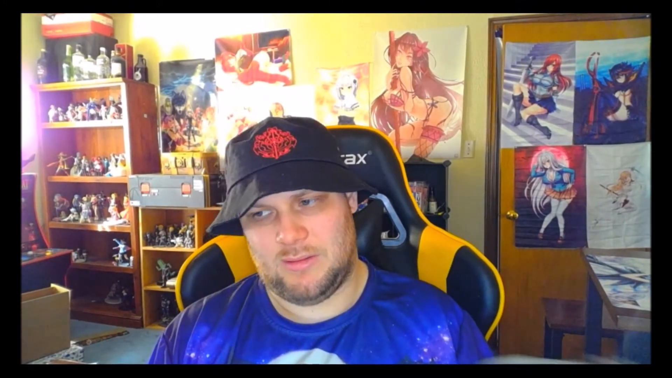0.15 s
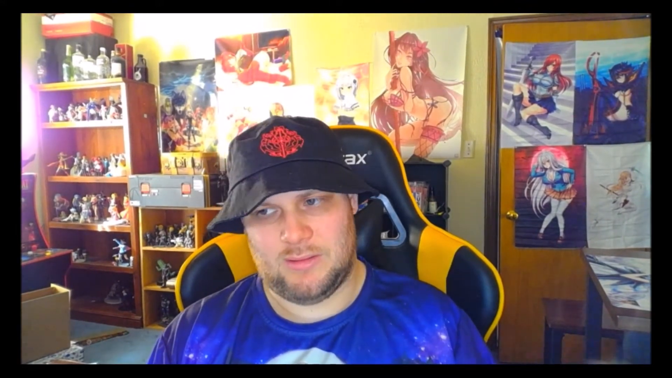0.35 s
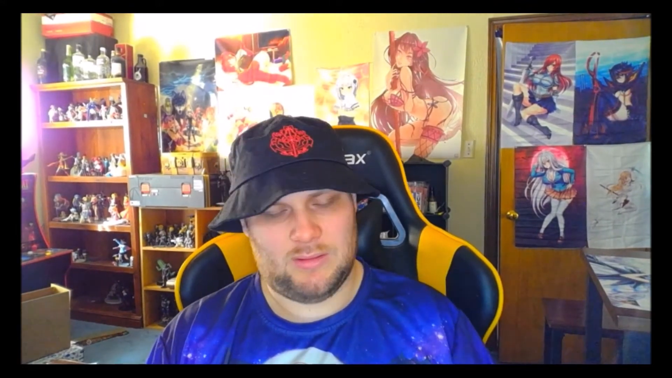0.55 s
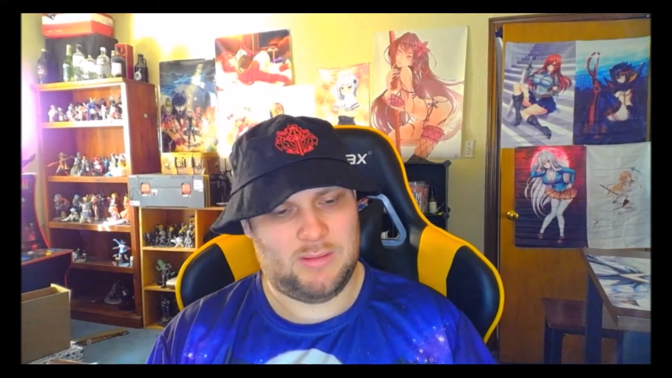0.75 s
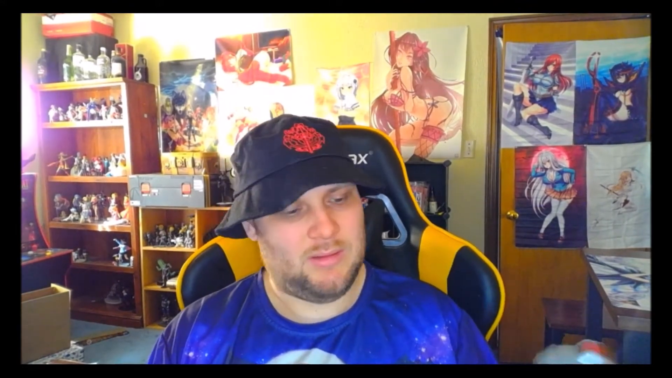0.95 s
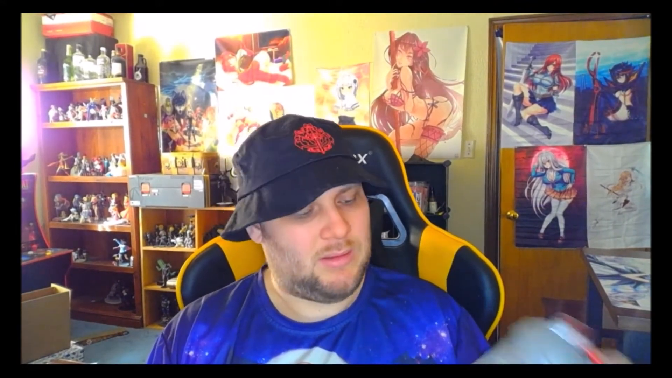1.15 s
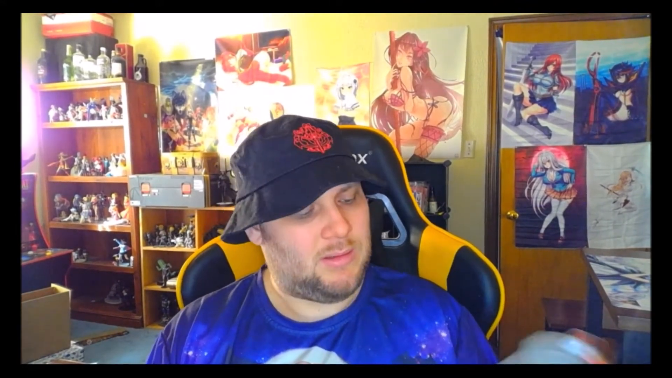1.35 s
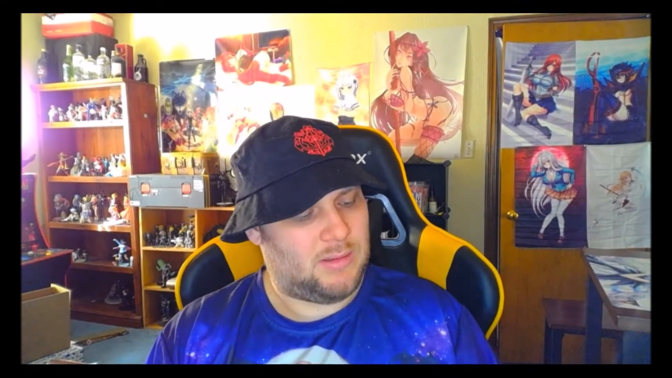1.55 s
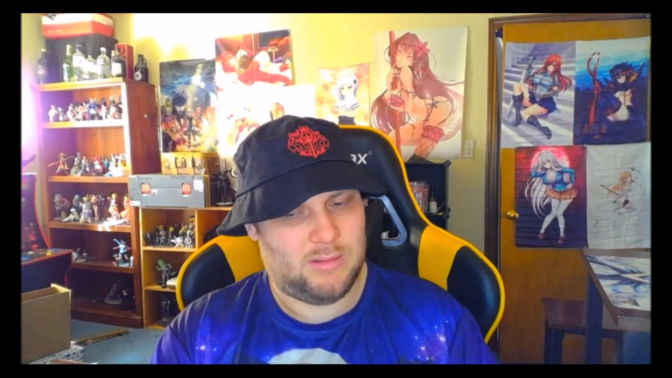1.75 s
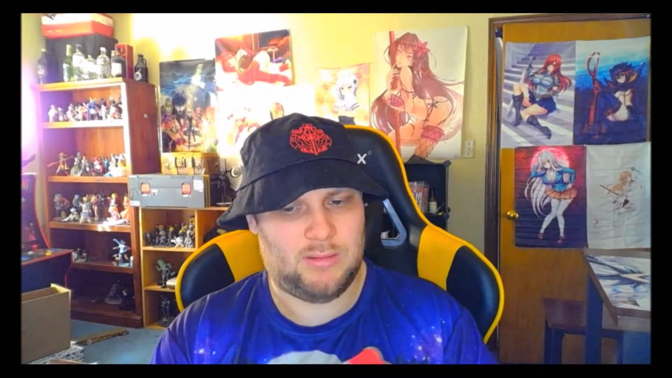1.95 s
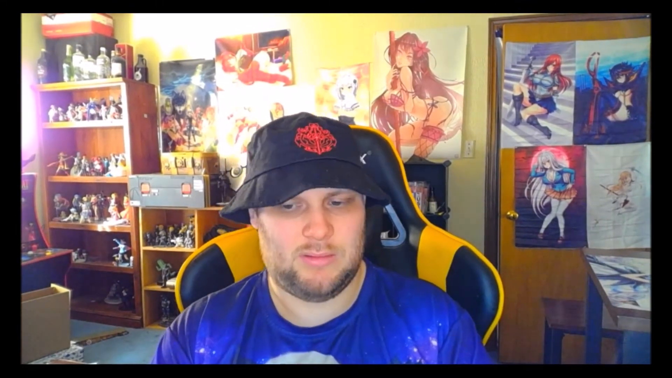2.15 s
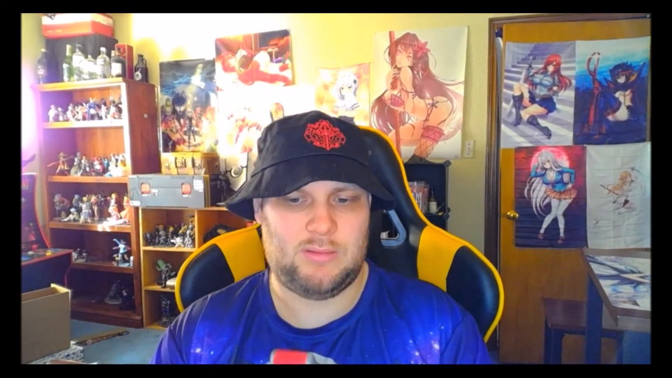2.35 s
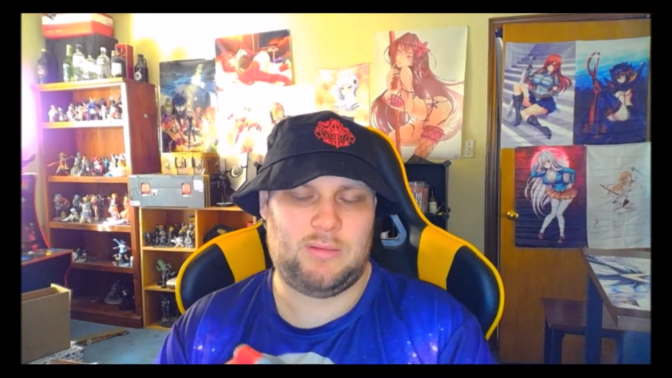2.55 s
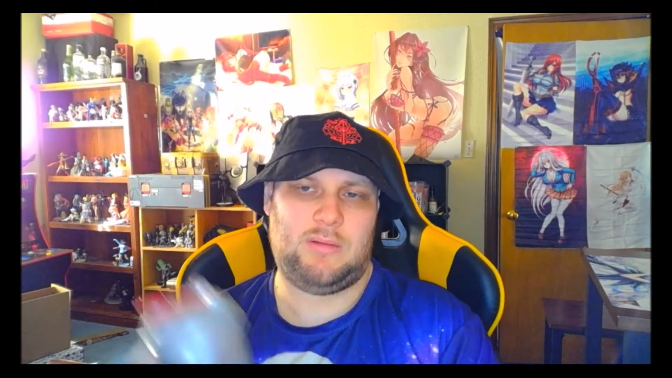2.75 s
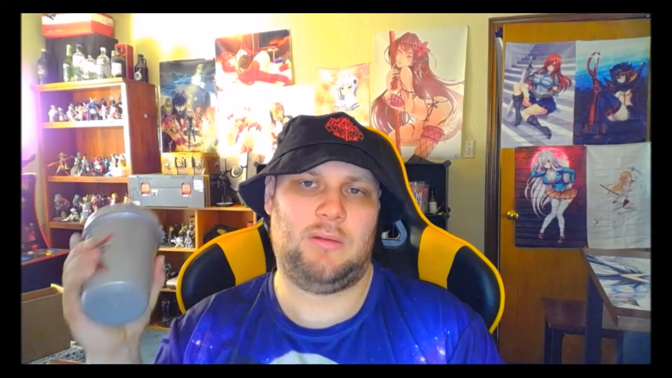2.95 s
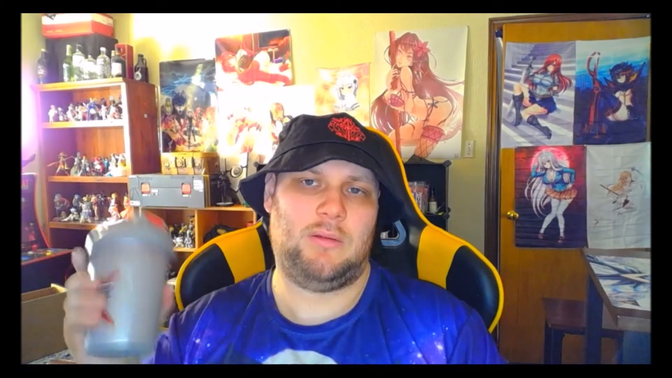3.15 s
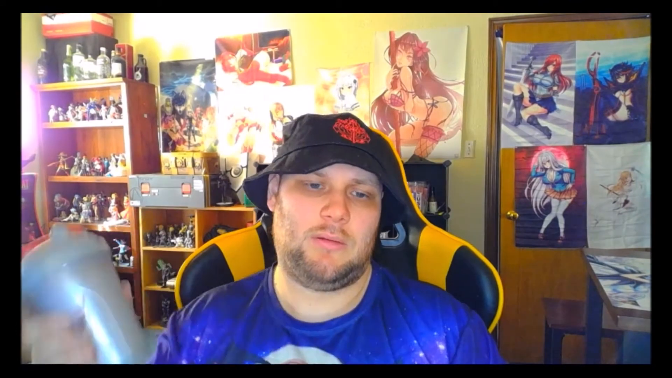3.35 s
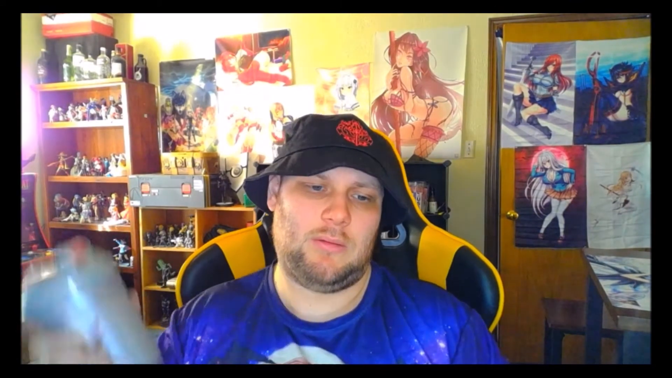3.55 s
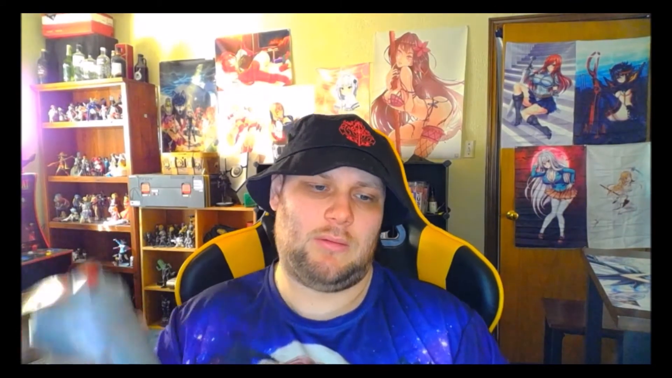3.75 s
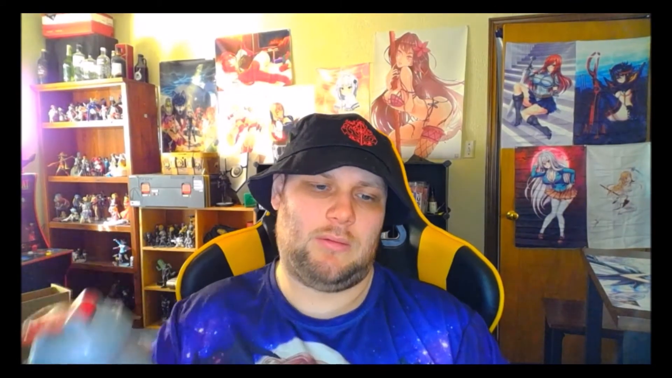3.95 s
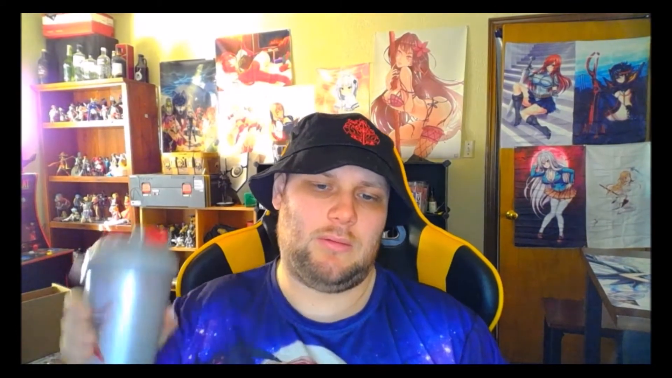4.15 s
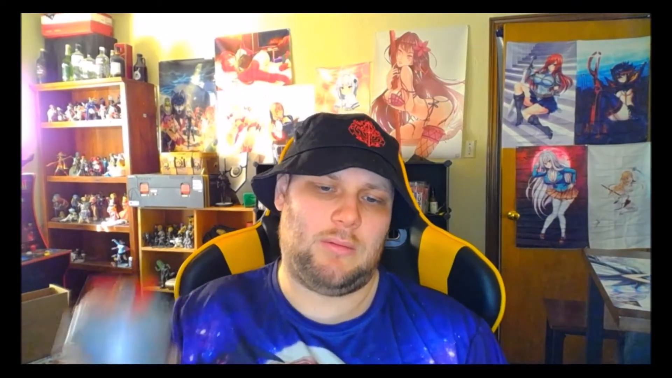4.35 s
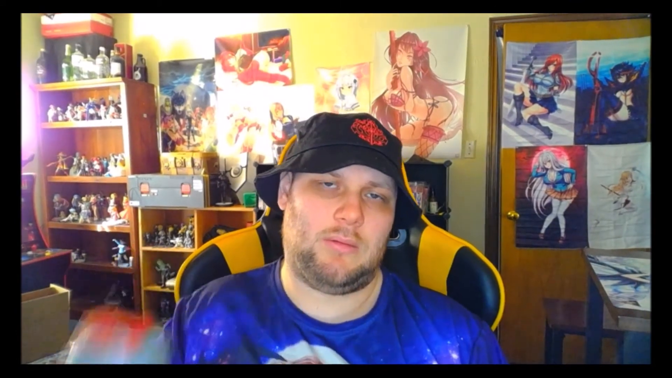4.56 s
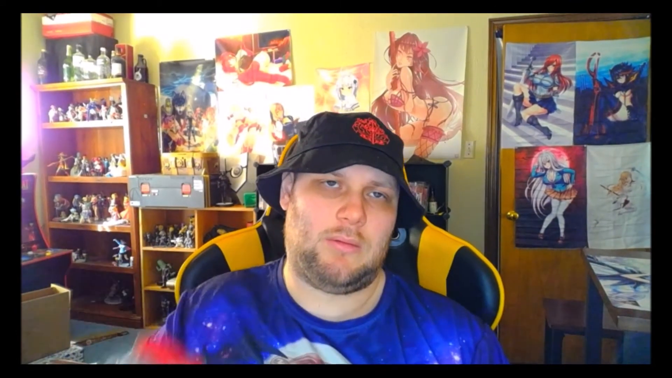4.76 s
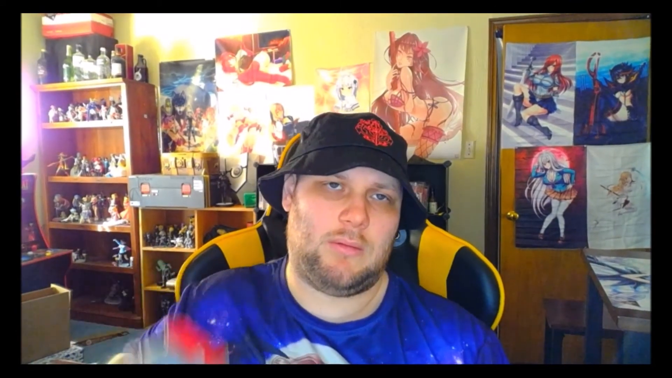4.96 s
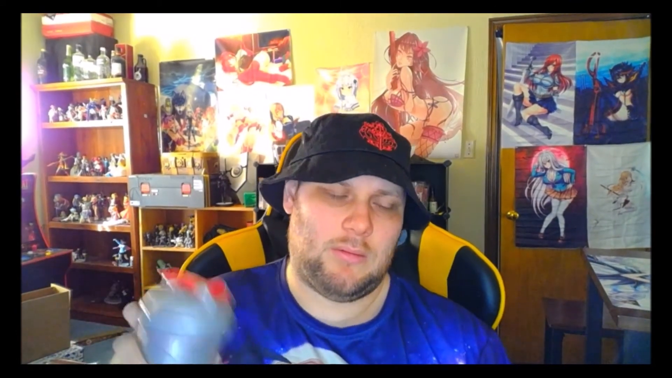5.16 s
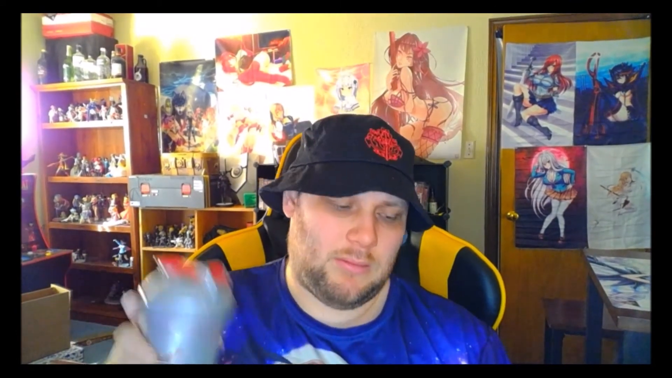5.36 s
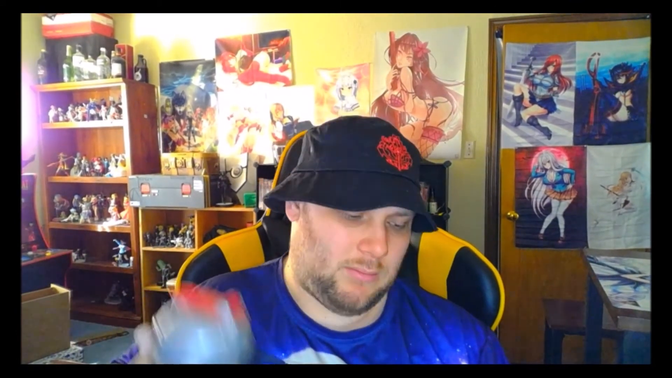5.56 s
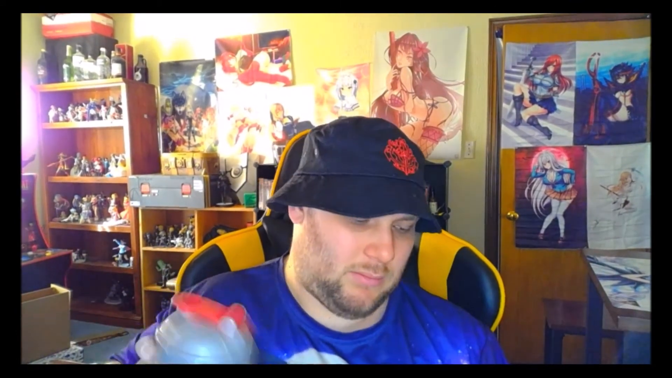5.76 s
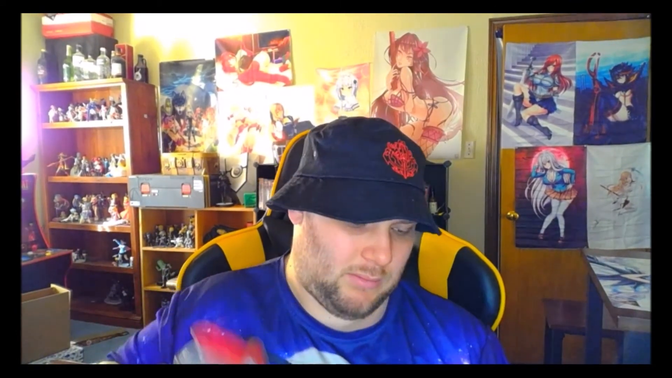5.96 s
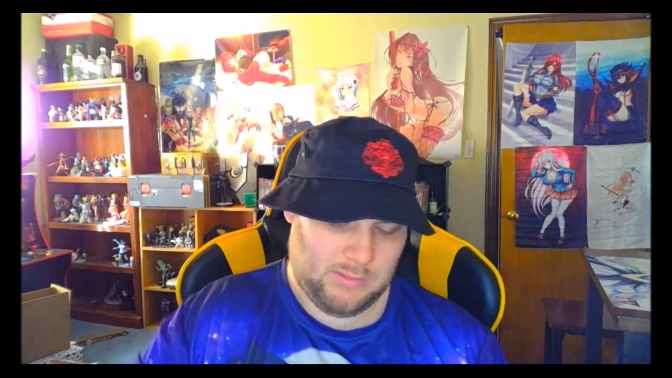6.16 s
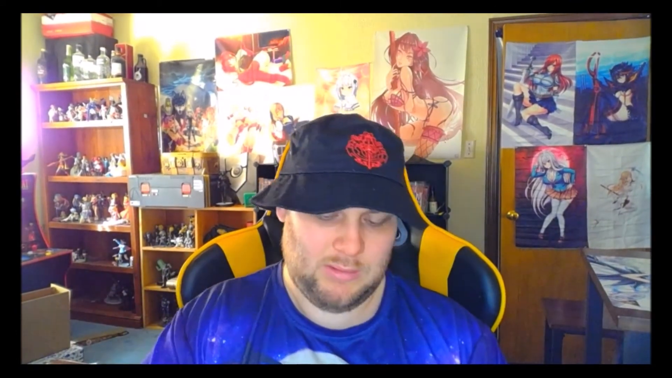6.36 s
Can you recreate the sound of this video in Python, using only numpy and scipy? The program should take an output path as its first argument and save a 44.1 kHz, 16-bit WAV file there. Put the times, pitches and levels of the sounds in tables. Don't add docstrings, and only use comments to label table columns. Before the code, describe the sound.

Close to a microphone in a small, nearly silent room, a plastic shaker cup is shaken very fast. Liquid slaps lid and base with gurgles and hissing spray while a wire ball clacks on the wall. It stops for over a second with faint tinkles, then a longer, wetter, more vigorous bout follows and quickly dies into small drips of slosh.

```python
import sys
import numpy as np
from scipy import signal
from scipy.fft import rfft, irfft, next_fast_len
from scipy.io import wavfile
from scipy.ndimage import uniform_filter1d

SR = 44100
rng = np.random.default_rng(int(sys.argv[2]) if len(sys.argv) > 2 else 0)


def transcribe(signal):
    frames = np.atleast_2d(signal).T
    limited = np.clip(frames, -1, 1)
    pcm = np.round(limited * 32767).astype(np.int16)
    wavfile.write(sys.argv[1], SR, pcm)


def volts_from_db(level):
    exponent = np.asarray(level, float) / 20
    return 10 ** exponent


N = 281843


def unit(x):
    return x / np.sqrt(np.mean(x ** 2) + 1e-20)


def along(points, hz):
    f, v = np.transpose(points)
    return np.interp(np.log(hz + 1), np.log(f + 1), v)


def filtered(x, response):
    m = next_fast_len(N + SR // 2)
    f = np.fft.rfftfreq(m, 1 / SR)
    return irfft(rfft(x, m) * response(f), m)[:N]


def ringing(modes, f):
    total = 0
    for k, (centre, width, db) in enumerate(modes):
        resonance = 1j * f * width / (centre * centre - f * f + 1j * f * width)
        total = total + (-1) ** k * volts_from_db(db) * resonance
    return total


def patchy(x, depth_db):
    z = signal.stft(x, nperseg=512)[2]
    field = uniform_filter1d(rng.standard_normal(z.shape), size=3, axis=0)
    field = uniform_filter1d(field, size=9, axis=1)
    return unit(signal.istft(z * volts_from_db(depth_db * unit(field)), nperseg=512)[1][:N])


def strokes(rows, lag=0, slower=1, round_off=1.1):
    power, t = np.full(N + SR, 1e-16), np.arange(SR // 2) / SR
    for s, db, rise, t60 in rows:
        top = max(rise + lag, .002)
        fall_db = -60 * (np.maximum(t - top, 0) / (slower * t60)) ** round_off
        swell = np.sin(np.pi / 2 * np.minimum(t / top, 1)) ** 0.92
        at = max(round(s * SR), 0)
        power[at:][:len(t)] += (volts_from_db(db + fall_db) * swell) ** 2
    return np.sqrt(power[:N])


# f/Hz, level/dB per Hz
STAND = [(12, -11), (30, -7), (55, -16.5), (90, -15.5), (140, -14), (200, -34.5), (350, -120)]
# t/s, level/dB
EFFORT = [
    [(0, -65.5), (1.76, -74), (1.9, -89), (2.55, -83)],
    [(2.94, -64.5), (4.2, -57), (5.96, -54), (6.07, -63.5), (6.39, -72)],
]
# t/s, level/dB
JOLTS = [(.44, -59), (.69, -55), (1.13, -52.5), (3.23, -64.5), (3.43, -57), (4.04, -54), (4.26, -40.5),
         (4.455, -49), (4.865, -47), (5.225, -57), (5.535, -45), (6.17, -56)]
# t/s, peak/dB
NUDGES = [(1.765, -60), (1.96, -63), (2.017, -59), (2.078, -49), (2.222, -63), (2.523, -67.5)]


def rumble():
    jolt_fade_db_per_s, nudge_s, spring_hz = 350.5, .007, 18
    t = np.arange(N) / SR
    level = sum(volts_from_db(np.interp(t, *np.transpose(bout), left=-np.inf, right=-np.inf)) for bout in EFFORT)
    jolts = sum(volts_from_db(db - jolt_fade_db_per_s * abs(t - s)) for s, db in JOLTS)
    level = np.where(level > 0, level + jolts, 0)
    shake = unit(filtered(rng.standard_normal(N), lambda f: volts_from_db(along(STAND, f))))
    slosh = turns()[0]
    push = uniform_filter1d(strokes([(s, -6, rise, t60) for s, _, rise, t60 in slosh]), size=600)
    throb = 0.36 + 2.1 * push ** 2.05
    nudges = sum(-volts_from_db(db) * np.exp(-((t - s) / nudge_s) ** 2) for s, db in NUDGES)
    sprung = filtered(nudges, lambda f: 1j * f / (spring_hz + 1j * f))
    return volts_from_db(2.5) * uniform_filter1d(level, size=900) * shake * throb + sprung


# f/Hz, t60/s
ROOM = [(200, 0.29), (1300, .24), (2500, 0.16), (10000, 0.13)]


def room(x):
    hz, t, z = signal.stft(rng.standard_normal(SR // 3), SR, nperseg=256)
    decay = volts_from_db(-60 * t / along(ROOM, hz)[:, None])
    tail = signal.istft(z * decay, SR, nperseg=256)[1]
    delayed = np.pad(x, (220, 0))
    return signal.fftconvolve(delayed, tail / np.linalg.norm(tail))[:N]


# t/s, peak/dB, centre f/Hz, t60/s, spread/0-1
TINKLES = [(2.081, -57.5, 7440, 0.075, 0.08), (2.185, -51.5, 7460, 0.094, 0.24),
           (2.399, -55, 7500, 0.037, 0.25), (6.154, -33, 7330, 0.046, 0.01), (6.156, -40, 10300, .03, 0),
           (6.271, -68, 8400, .08, .05), (2.345, -74.5, 6570, 0.14, .05), (2.4, -77, 2680, .1, 0.15),
           (6.168, -45, 5260, .03, .06), (6.188, -62, 7000, 0.05, 0.3), (6.271, -55, 3600, 0.062, 0.21)]
WIRE_HZ = [2680, 3400, 4410, 5260, 6200, 6570, 7500, 8400, 8800, 10300, 11200]


def tinkles():
    out, t, modes = np.zeros(N + SR), np.arange(SR // 5) / SR, np.array(WIRE_HZ)[:, None]
    for s, db, hz, t60, spread in TINKLES:
        drift = np.cumsum(rng.standard_normal((len(modes), len(t))), axis=1)
        drift = uniform_filter1d(drift, size=40, axis=1)
        woken = np.exp(-(np.log(modes / hz) / max(spread, .05)) ** 2 / 2)
        wires = woken * np.sin(2 * np.pi * modes * t + modes / 60000 * drift)
        envelope = volts_from_db(db - 8 - 60 * t / t60) * (1 - np.exp(-t / .006))
        out[round(s * SR):][:len(t)] += envelope * wires.sum(0)
    return out[:N]


# t/s, peak/dB, f/Hz
SPITS = [(0.0596, -38, 5570), (0.0835, -35.5, 8780), (0.2844, -55, 6390), (0.3122, -49, 5920),
         (0.3524, -56, 8520), (0.4, -43.5, 8610), (0.4419, -36.5, 9450), (0.4569, -31.5, 5800),
         (0.4995, -41.5, 8730), (0.5408, -37, 8400), (0.9157, -31, 5530), (0.9802, -38, 6620),
         (1.21, -41.5, 8810), (1.229, -36, 6610), (2.993, -44, 6170), (3.0743, -25.5, 6200),
         (3.2098, -35, 6600), (3.4016, -30.5, 7780), (3.4371, -34.5, 6340), (3.5335, -28, 8420),
         (3.6037, -32, 6120), (3.675, -26, 6020), (3.826, -40, 8500), (3.8447, -22, 6360),
         (3.851, -69, 5710), (4.141, -34.5, 8050), (4.1802, -27, 6920), (4.2506, -34.5, 6370),
         (4.352, -37, 6100), (4.5473, -32, 5960), (4.5813, -37.5, 7000), (4.62, -38.5, 8020),
         (4.6582, -52, 5980), (4.7543, -32.5, 9340), (4.9515, -32, 9350), (5.036, -40, 6960),
         (5.1342, -34, 8120), (5.1544, -43, 6490), (5.2893, -36, 6730), (5.305, -31.5, 7100),
         (5.439, -20.5, 9120), (5.4938, -40, 7310), (5.5061, -20, 7630), (5.5088, -30, 9050),
         (5.603, -20.5, 5680), (5.627, -26, 6770), (5.7025, -20.5, 7130), (5.8002, -46.5, 6500),
         (5.8486, -37.5, 9230), (5.8613, -25.5, 9440), (5.885, -27, 6620), (5.9135, -36, 7350),
         (6.0566, -51, 5500), (6.0774, -56, 6020)]


def spits():
    t60_s, log_width, trim_db = .013, .11, -7
    out, t = np.zeros(N + SR), np.arange(1024) / SR
    f = np.fft.rfftfreq(len(t), 1 / SR)
    for s, db, hz in SPITS:
        band = np.exp(-(np.log((f + 1) / hz) / log_width) ** 2 / 2)
        hiss = unit(irfft(rfft(rng.standard_normal(len(t))) * band))
        envelope = volts_from_db(db + trim_db - 60 * t / t60_s) * (1 - np.exp(-t / .0015))
        out[round(s * SR):][:len(t)] += envelope * hiss
    return out[:N]


# t/s, peak/dB, f/Hz
GULPS = [(0.189, -30, 575), (0.663, -29.5, 557), (0.985, -31, 630), (1.134, -33, 251), (1.346, -30.5, 677),
         (1.379, -30.5, 352), (1.684, -39.5, 622), (1.795, -44, 604), (1.912, -52.5, 468),
         (1.915, -46, 620), (2.992, -34.5, 396), (3.23, -24, 500), (3.857, -32, 383), (4.032, -35.5, 272),
         (4.047, -29.5, 565), (4.251, -22, 750), (4.373, -35, 397), (4.455, -25.5, 524), (4.686, -27, 587),
         (5.042, -25, 385), (5.064, -30, 370), (5.414, -30, 630), (5.608, -24, 595), (5.799, -24.5, 600),
         (5.824, -27, 673), (5.863, -26, 430), (6.245, -43, 564),
         (1.631, -35.5, 598), (1.911, -56, 880), (2.884, -32.5, 765), (2.896, -33, 800), (6.107, -48, 575),
         (6.132, -43, 537), (6.272, -49, 705), (2.67, -78, 1010), (1.585, -33, 615), (1.78, -65, 1690),
         (1.85, -65, 1270)]


def gulps():
    out, t = np.zeros(N + SR), np.arange(SR // 12) / SR
    for s, db, hz in GULPS:
        swell = (1 - np.exp(-t / 0.0024)) * volts_from_db(db - 60 * t * hz / 25)
        out[round(s * SR):][:len(t)] += swell * np.sin(2 * np.pi * hz * t * (1 + 0.49 * t))
    return out[:N]


# f/Hz, width/Hz, level/dB
CUP = [(226, 81.6, -1.5), (393, 68, 6), (568, 165, 0), (795, 215, -8.5), (1617, 607, -4.5),
       (2375, 886, -1.5), (3300, 2170, -1.5), (4490, 1380, -1)]


def cup(f):
    return ringing(CUP, f)


# t/s, peak/dB, ring f/Hz, edge/dB
ON_LID = [(0.0692, -23, 1870, -17.5), (0.3276, -22, 2290, -36.5), (0.5412, -21, 2520, -25.5),
          (0.767, -23, 2320, -17.5), (0.9915, -20.5, 2276, -14.5), (1.2444, -22, 2200, -20.5),
          (1.453, -24, 1850, -21.5), (1.6327, -33.5, 1707, -28), (2.8847, -26.5, 1730, -52),
          (3.1307, -21.5, 1620, -41), (3.3145, -25.5, 2250, -19.5), (3.5366, -22, 2000, -16.5),
          (3.7392, -21.5, 2160, -22.5), (3.934, -34.5, 2270, -6), (4.1426, -23.5, 2710, -9.5),
          (4.347, -23, 2350, -12), (4.5248, -15.5, 2420, -22.5), (4.754, -42, 2300, -4),
          (4.944, -28, 2920, -12.5), (5.108, -27.5, 2600, -9.5), (5.307, -32, 2870, -7),
          (5.498, -26, 2050, -13.5), (5.6898, -29, 2840, -7)]
# t/s, peak/dB, ring f/Hz, edge/dB
ON_BASE = [(.878, -31, 1470, -37), (1.1125, -20.5, 1470, -45.5), (.19, -37.5, 1850, -48),
           (2.9923, -34.5, 2620, -9.5), (3.2316, -31.5, 2780, -9.5), (3.42, -26, 1810, -19),
           (3.676, -23.5, 3820, -40), (3.852, -25, 3900, -5.5), (4.2515, -28.5, 1710, -10),
           (4.457, -23, 1580, -41), (4.6597, -29.5, 1550, -9), (4.866, -37, 1750, -30.5),
           (5.036, -31.5, 2680, -8), (5.195, -26, 2560, -19), (5.404, -17, 1290, -36.5),
           (5.7667, -47, 1460, -35), (5.959, -31, 2900, -15.5)]
# t/s, peak/dB, ring f/Hz, edge/dB
STRAY_KNOCKS = [(0.5297, -34, 2450, -15), (0.7622, -24.5, 2320, -23), (0.984, -21, 1780, -36.5),
                (1.235, -39.5, 2430, 0.5), (1.4468, -27.5, 2230, -22), (3.111, -40.5, 1705, -4.5),
                (3.362, -30, 2450, -26), (3.522, -41, 2260, -14), (3.5422, -27, 2180, -21),
                (3.7653, -37, 2240, -39), (3.967, -28, 2550, -25), (4.548, -23, 2630, -9.5),
                (4.6412, -26, 1800, -45), (6.06, -28, 3260, -35), (6.108, -42, 3300, -42),
                (6.135, -43.5, 3370, -22), (6.1686, -39, 2680, -20.5), (6.1893, -40.5, 2840, -20),
                (0.0612, -27, 1790, -27), (0.187, -29.5, 2330, -25), (0.4129, -26.5, 1900, -31),
          (0.6504, -43.5, 2340, -25), (1.1034, -23, 1315, -36.5), (3.2121, -31, 1600, -29),
          (3.7707, -27.5, 2310, -27), (4.1337, -31, 2720, -36), (4.3519, -25.5, 2630, -23),
          (4.803, -26, 2450, -30), (5.1544, -29.5, 2330, -21), (5.4124, -38, 1210, -30),
          (5.5414, -32, 2960, -30), (5.603, -29, 1310, -29), (5.6236, -28, 2730, -22),
          (5.8673, -27, 2370, -25), (5.8864, -29, 2000, -30), (6.0072, -31, 2930, -26)]
# t/s, peak/dB, ring f/Hz, edge/dB
SETTLING = [(1.5564, -33, 1760, -36), (1.651, -44, 2860, -25), (1.68, -43, 1900, -33),
            (1.687, -42, 1750, -26), (1.7944, -69, 1720, -17), (6.0774, -45, 2370, -22)]
# f/Hz, width/Hz, level/dB
LID = [(2382, 170, -2), (2840, 300, -7.5)]
# f/Hz, level/dB per Hz
SPRAY = [(2650, -41), (4500, 1), (5450, -5.5), (6300, -2), (9000, -5.5), (11200, -12), (13200, -27.5),
         (15600, -45.5)]


def ball():
    snap_db, snap_t60_s = 9, .006
    ring, edges, kicks = np.zeros(N + SR), np.zeros(N + SR), np.zeros(N)
    t = np.arange(SR // 20) / SR
    for s, db, hz, edge_db in ON_LID + ON_BASE + STRAY_KNOCKS + SETTLING:
        at = round(s * SR)
        contact_s = 0.00015 * volts_from_db(-.6 * (db + 27.0))
        hard_db = min(0.61 * (edge_db + 13.5), 0) + min(.5 * (db + 30.0), 0)
        crack = volts_from_db(10 + hard_db - 60 * t / .003) * np.sin(2 * np.pi * np.sqrt(3000 * hz) * t)
        wall = (.45 + .3 * abs(ringing(LID, hz))) * volts_from_db(-60 * t / .021) * np.sin(2 * np.pi * hz * t)
        ring[at:][:len(t)] += volts_from_db(db) * (crack + wall) * (1 - np.exp(-t / contact_s))
        fade = volts_from_db(-60 * t / 0.04) + volts_from_db(snap_db - 60 * t / snap_t60_s)
        attack = 1 - np.exp(-t / 0.00062)
        edges[at:][:len(t)] += volts_from_db(db + edge_db + 6) * fade * attack * rng.standard_normal(len(t))
        kicks[at] = volts_from_db(db + 8.5)

    def soft(f):
        return 1 / (1 + 1j * f / 11000) ** 6

    def kicked_cup(f):
        return cup(f) * soft(f) * (1j * f / (250 + 1j * f)) ** 3

    def bright(f):
        return volts_from_db(along(SPRAY, f)) / (1 + (f / 11500) ** 12)

    return filtered(ring[:N], soft) + filtered(kicks, kicked_cup) + filtered(edges[:N], bright)


# t/s, splash/dB, slosh/dB, rise/s
TO_LID = [(0.058, -37, -44, 0.014), (0.302, -39, -40, 0.025), (0.528, -34.5, -38, 0.014),
          (.757, -31.5, -41, 0.0078), (0.976, -32, -39, 0.014), (1.216, -35, -40.5, 0.025),
          (1.436, -39.5, -43, 0.018), (2.877, -42.5, -50, 0.014), (3.094, -41, -46.5, 0.035),
          (3.297, -43.5, -48.5, 0.035), (3.533, -36.5, -42.5, 0.0054), (3.737, -39.5, -40.5, 0.011),
          (3.932, -35.5, -41, 0.0053), (4.13, -35, -39.5, 0.02), (4.34, -35.5, -36.5, 0.015),
          (4.526, -35.5, -41, 0.041), (4.751, -38, -39.5, 0.026), (4.918, -38.5, -42.5, 0.045),
          (5.104, -39, -39, 0.035), (5.298, -38.5, -39, 0.025), (5.484, -36.5, -35.5, 0.035),
          (5.666, -38, -40.5, 0.042), (5.856, -37, -43, 0.0051)]
# t/s, splash/dB, slosh/dB, rise/s
TO_BASE = [(0, -41.5, -44.5, 0.0032), (0.173, -39.5, -37, 0.032), (0.4, -44, -39, 0.059),
           (0.654, -44, -45, 0.061), (.858, -43.5, -43.5, 0.059), (1.1, -43.5, -39.5, 0.063),
           (1.336, -44, -40.5, .046), (1.553, -47.5, -45, 0.016), (2.981, -42.5, -49, 0.051),
           (3.204, -39, -39.5, 0.0086), (3.392, -41.5, -37.5, 0.034), (3.624, -42.5, -38.5, 0.041),
           (3.827, -39, -42, 0.031), (4.021, -38, -31.5, 0.019), (4.216, -37, -35, 0.045),
           (4.432, -36, -33.5, 0.035), (4.637, -38.5, -33, 0.049), (4.84, -38.5, -38, 0.049),
           (5.021, -36.5, -34, 0.026), (5.197, -39.5, -41, 0.046), (5.399, -37, -32, 0.022),
           (5.581, -36.5, -35, 0.043), (5.759, -41, -33, 0.045), (5.934, -42, -38.5, 0.041)]
# t/s, splash/dB, slosh/dB, rise/s, lid ring over its kind/dB
LAPPING = [(1.623, -49.5, -52.5, 0.016, 0), (1.676, -62.5, -74, 0.0085, -14),
           (1.788, -89, -67.5, 0.014, -9), (1.91, -90, -80, 0.0074, -9), (2.839, -74.5, -92, 0.0051, 29),
           (2.866, -68, -96, 0.0052, 19), (6.044, -57.5, -54, 0.016, -5), (6.148, -59.5, -55, 0.014, 0),
           (6.185, -64, -69, 0.018, 14), (6.31, -87.5, -82, 0.017, 3), (6.267, -80.5, -68, 0.0069, 20)]
# splash t60/s, slosh t60/s, slosh rise/s, spray/dB, lid ring/dB
KINDS = [
    (0.27, 0.24, 0.019, -0.5, -4.5),
    (0.32, 0.2, 0.011, 4, -9),
    (0.13, 0.21, 0.004, -0.5, -14.5),
]
# t/s, spray/dB, lift of finest spray/dB
FROTH = [(0, -20, -5.5), (1.7, -19, 6.5), (2.88, -17, -18), (3, -13.5, -29), (4.13, -14, -19.5),
         (4.18, -9.5, 19), (4.31, -17.5, 16), (4.35, -12.5, -18), (4.5, -10.5, -5), (4.65, -11.5, 10),
         (5.14, -14, 17), (5.39, -13, -20.5), (5.43, -16, 20), (5.55, -11.5, 7), (5.82, -10.5, 15.5),
         (5.9, -14, 3), (6.05, -31, -9), (6.25, -5.5, -13)]
# t/s, shift/dB
LEAN = [(1.5, 3.5), (3.2, -1), (4, 3), (5, 3.5)]


def turns():
    rise_share, loud_db = 0.81, -35
    splash_drains, slosh_drains = 0.17, 0.63
    slosh, wall, mist, rung = [], [], [], []
    for rows, end, kind in zip((TO_LID, TO_BASE, LAPPING), (1, -1, 1), KINDS):
        wall_t60, slosh_t60, slosh_rise, spray_db, ring_db = kind
        for s, db, slosh_db, rise, *more_db in rows:
            t60 = wall_t60 * volts_from_db(-splash_drains * np.clip(db - loud_db, -8, 8))
            boom_t60 = slosh_t60 * volts_from_db(-slosh_drains * np.clip(slosh_db - loud_db, -8, 8))
            froth_db = np.interp(s, *np.transpose(FROTH)[:2]) + end * np.interp(s, *np.transpose(LEAN))
            slosh.append((s, slosh_db, slosh_rise + rise_share * rise, boom_t60))
            wall.append((s, db, rise, t60))
            mist.append((s, db + froth_db + spray_db, rise, t60))
            rung.append((s, db + ring_db + sum(more_db), rise, t60))
    return slosh, wall, mist, rung


def drops(per_s, spread_db, wash):
    chance, side, size = rng.random((3, N))
    hits = (chance < per_s / SR) * np.sign(side - .5) * volts_from_db(-spread_db * np.log(size + 0.016))
    return unit(hits) + wash * rng.standard_normal(N)


def bubbles(per_s, mid_hz, spread, cycles, spread_db):
    t = np.arange(900) / SR
    count = rng.binomial(5760, per_s / 900)
    pitch, size = rng.standard_normal((2, count, 1))
    hz = np.clip(mid_hz * np.exp(spread * pitch), 150, 9000)
    age = t * hz / cycles
    envelope = volts_from_db(spread_db * size) * age * np.exp(-3 * age)
    tone = envelope * np.sin(2 * np.pi * hz * t * (1 + 0.022 * age))
    at = rng.integers(0, N, (count, 1)) + np.arange(len(t))
    return unit(np.bincount(at.ravel(), tone.ravel(), N + len(t))[:N])


# f/Hz, level/dB
GURGLE = [(60, -50.5), (150, -5.5), (300, -8.5), (450, -10), (800, 7), (1200, 0), (2500, -32.5)]
# f/Hz, level/dB
PATTER = [(300, -19.5), (800, -17), (1300, -1), (3000, -2.5), (4800, -12.5), (5600, -10), (8000, -44)]


def liquid():
    thump_db, thump_hz = -45.5, 320
    slosh, wall, mist, rung = turns()

    boom = unit(filtered(drops(700, spread_db=9, wash=.9), lambda f: cup(f) * volts_from_db(along(GURGLE, f))))
    boom = unit(boom + .6 * bubbles(150, mid_hz=520, spread=.45, cycles=5, spread_db=2.5))
    weak = 1 - np.clip(uniform_filter1d(strokes(slosh), size=2000) / volts_from_db(thump_db), 0, 1)
    boom = boom - weak * filtered(boom, lambda f: 1 / (1 + (f / thump_hz) ** 6))

    patter = unit(filtered(drops(2200, spread_db=6, wash=.8), lambda f: cup(f) * volts_from_db(along(PATTER, f))))
    patter = patter + .5 * bubbles(600, mid_hz=2590, spread=0.4, cycles=9, spread_db=3)
    patter = patchy(patter, depth_db=2)

    lid_hits = drops(1200, spread_db=4.5, wash=1)
    lid = unit(filtered(lid_hits, lambda f: ringing(LID, f) * volts_from_db(along(PATTER, f))))

    spray = unit(filtered(drops(3000, spread_db=4, wash=1.3), lambda f: volts_from_db(along(SPRAY, f))))
    spray = spray + 0.13 * bubbles(220, mid_hz=6670, spread=0.24, cycles=71, spread_db=-2)
    spray = patchy(spray, depth_db=5)
    spray = unit(spray + .5 * bubbles(200, mid_hz=7500, spread=.3, cycles=6, spread_db=6))
    finest = filtered(spray, lambda f: 1 / (1 + (12800 / (f + 1)) ** 14))
    s, _, lift_db = np.transpose(FROTH)
    spray = spray + (volts_from_db(np.interp(np.arange(N) / SR, s, lift_db)) - 1) * finest
    foam = strokes(mist, lag=0.029, slower=0.93, round_off=1)
    burst = strokes(mist, lag=0.0034, slower=0.45, round_off=2)

    return (volts_from_db(-0.74) * boom * strokes(slosh, round_off=0.88)
            + volts_from_db(-3.0) * patter * strokes(wall, round_off=0.92)
            + volts_from_db(-1.67) * lid * strokes(rung, lag=0.0082, slower=0.91, round_off=1)
            + volts_from_db(-2.0) * spray * np.hypot(burst, volts_from_db(-4.5) * foam))


def scene():
    shaker = tinkles() + spits() + gulps() + ball() + liquid()
    return (rumble() + volts_from_db(-17.0) * room(shaker) + shaker)[None]


def top_cut(x):
    return signal.sosfilt(signal.butter(12, 15640, fs=SR, output="sos"), x)


# f/Hz, level/dB a bin
SUPPRESSED = [(30, -100), (200, -100), (1500, -104), (6000, -104), (12000, -106), (16000, -108)]


def record(dry):
    hz, _, z = signal.stft(dry, SR, nperseg=512, noverlap=384)
    power = uniform_filter1d(np.abs(z) ** 2, size=9, axis=2)
    power = np.abs(uniform_filter1d(power, size=3, axis=1))
    noise = volts_from_db(2 * along(SUPPRESSED, hz))[:, None]
    gain = (power / (power + noise)) ** 0.47
    clean = signal.istft(z * gain, SR, nperseg=512, noverlap=384)[1][:, :N]
    return top_cut(clean)


dry = scene()
out = record(dry)
transcribe(out)
```